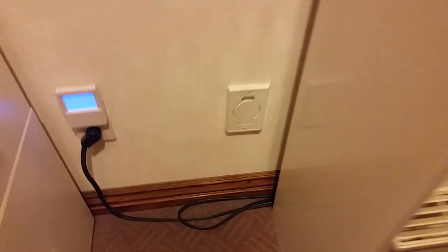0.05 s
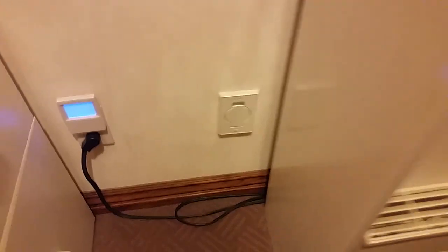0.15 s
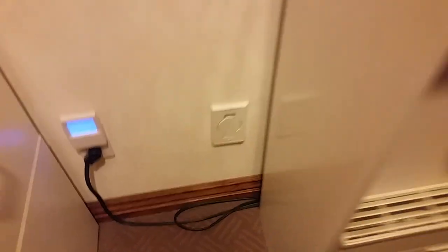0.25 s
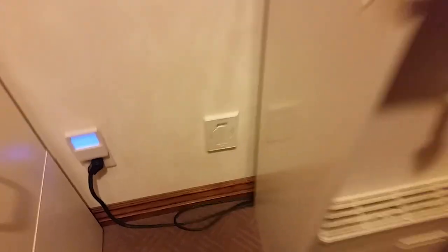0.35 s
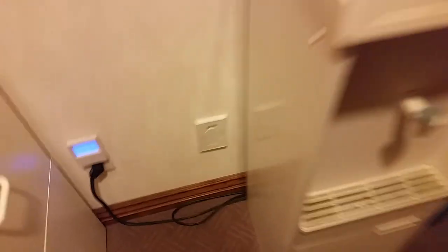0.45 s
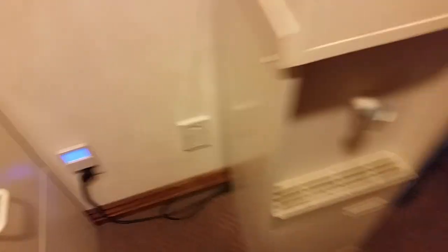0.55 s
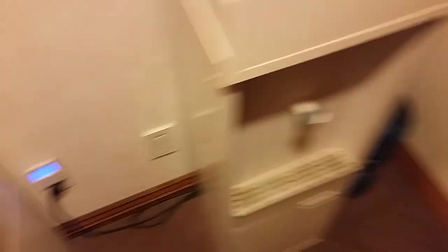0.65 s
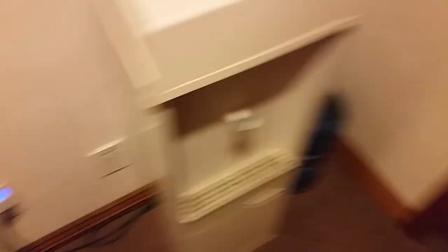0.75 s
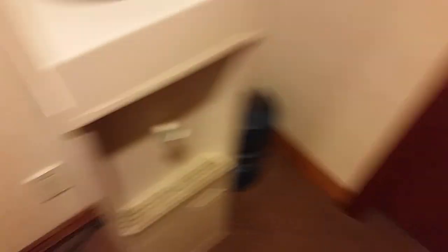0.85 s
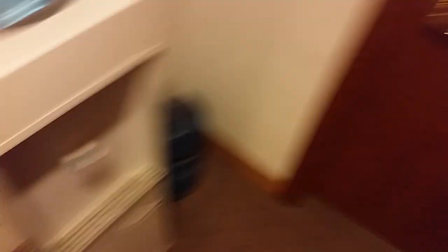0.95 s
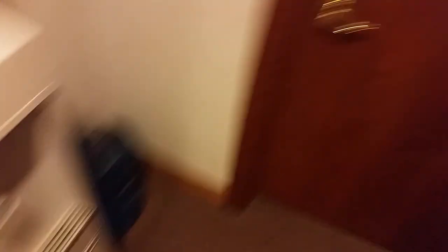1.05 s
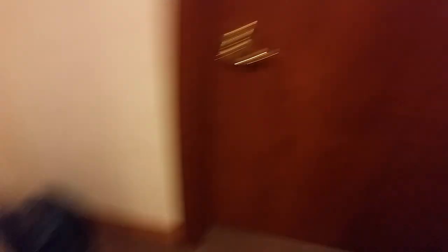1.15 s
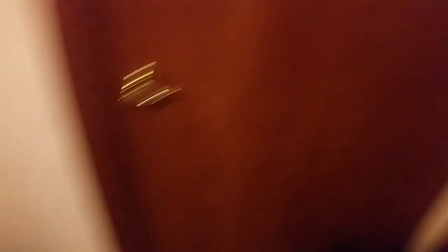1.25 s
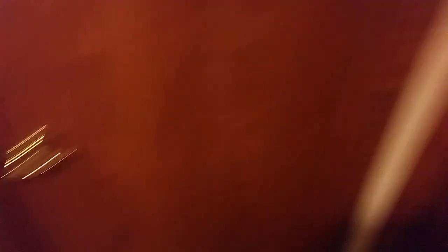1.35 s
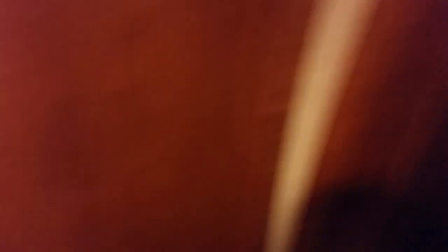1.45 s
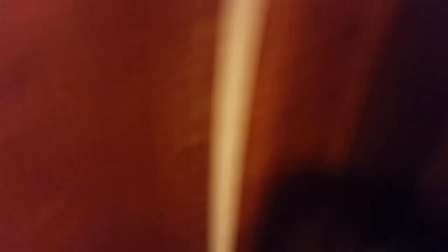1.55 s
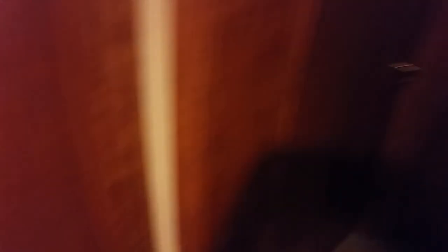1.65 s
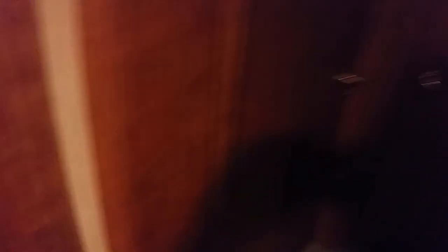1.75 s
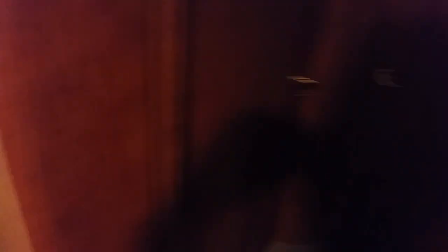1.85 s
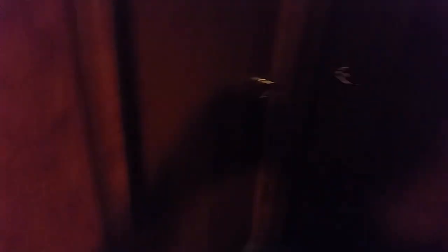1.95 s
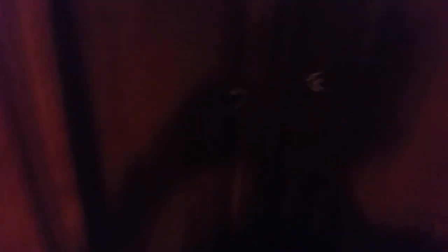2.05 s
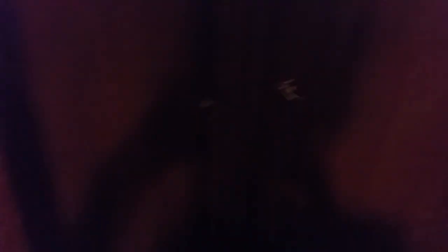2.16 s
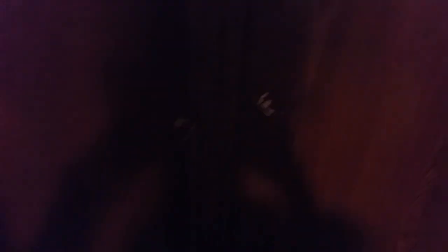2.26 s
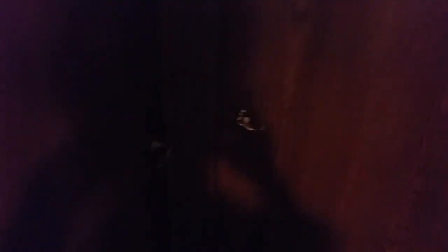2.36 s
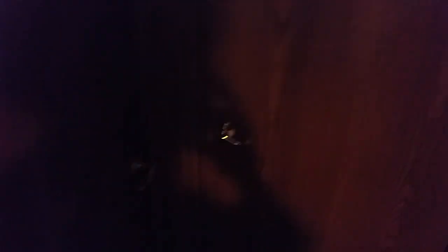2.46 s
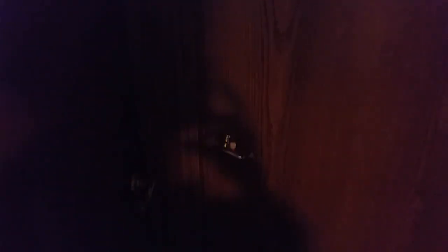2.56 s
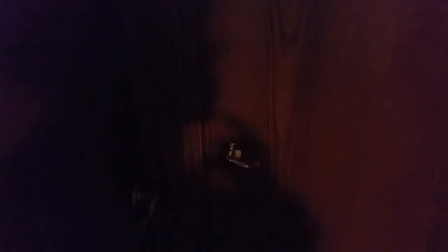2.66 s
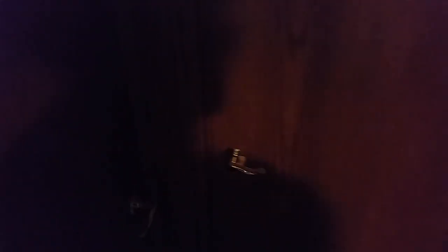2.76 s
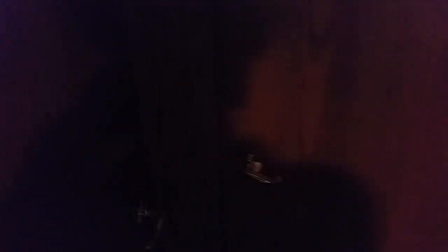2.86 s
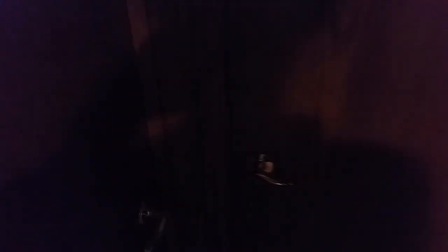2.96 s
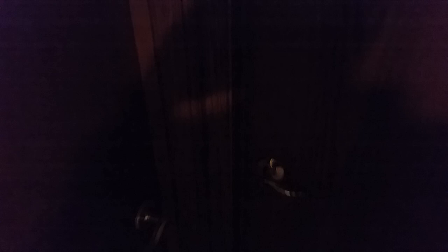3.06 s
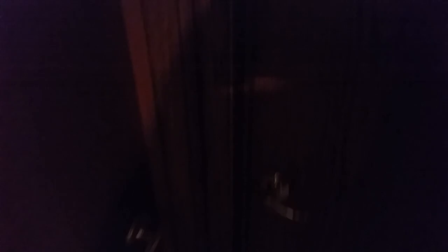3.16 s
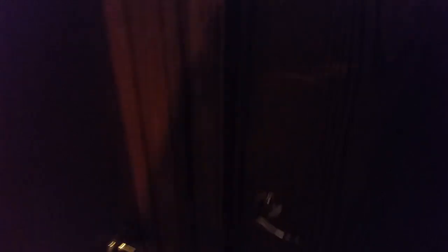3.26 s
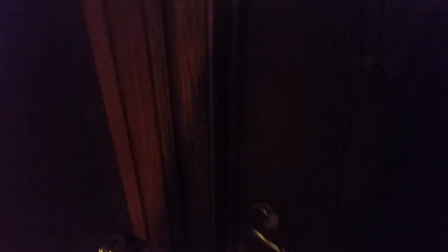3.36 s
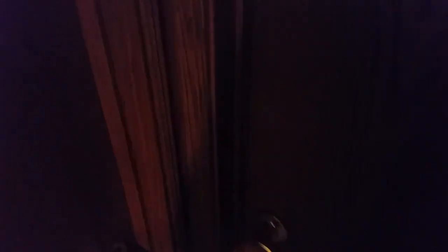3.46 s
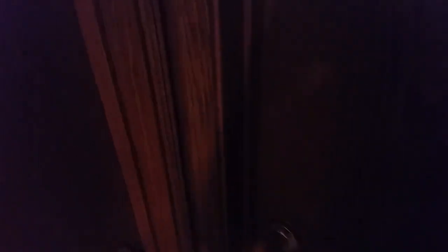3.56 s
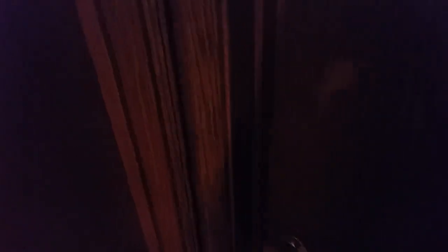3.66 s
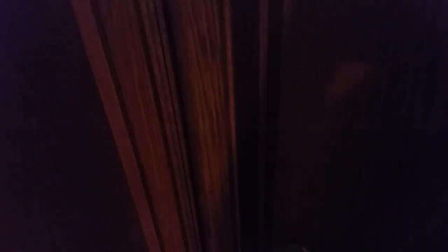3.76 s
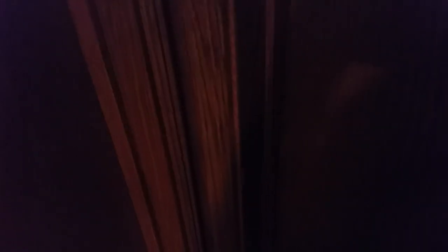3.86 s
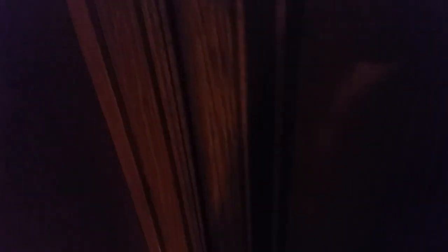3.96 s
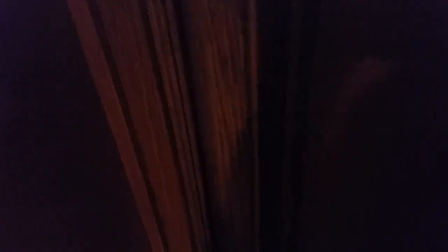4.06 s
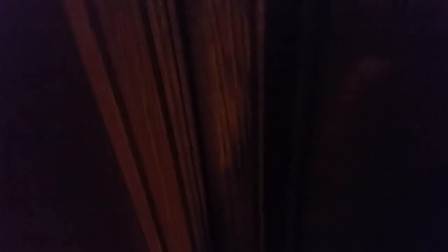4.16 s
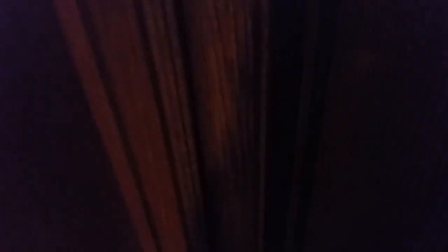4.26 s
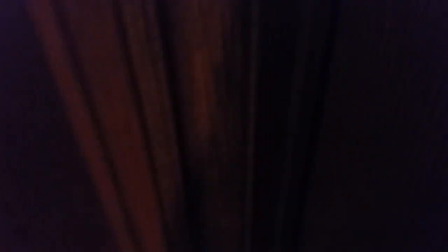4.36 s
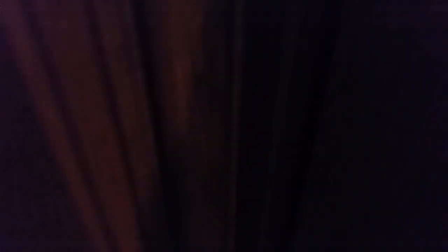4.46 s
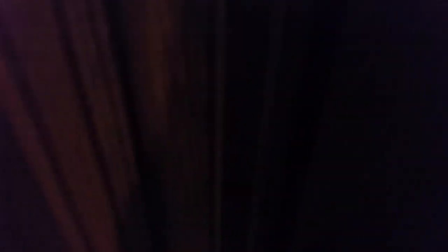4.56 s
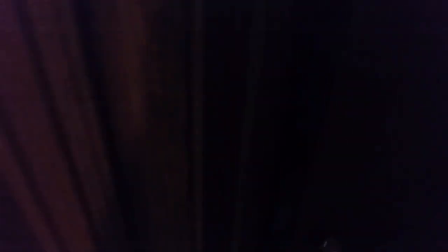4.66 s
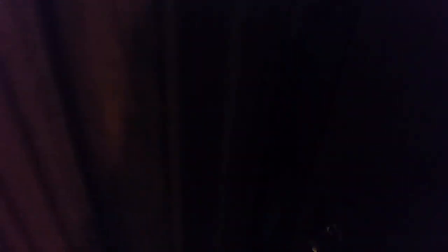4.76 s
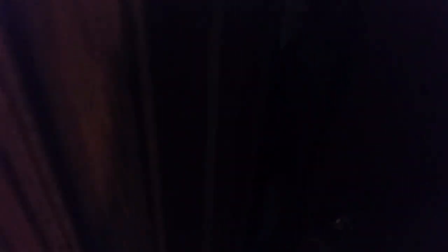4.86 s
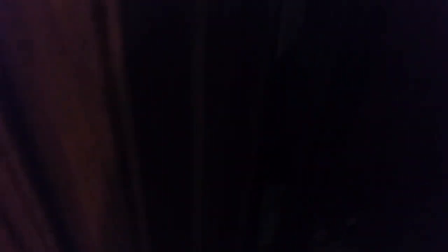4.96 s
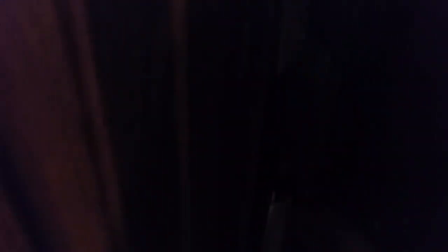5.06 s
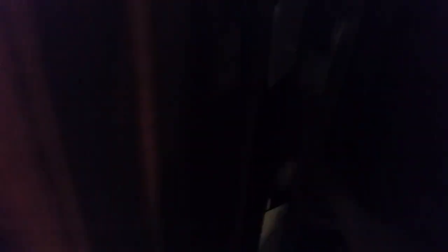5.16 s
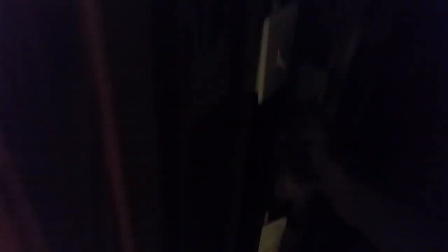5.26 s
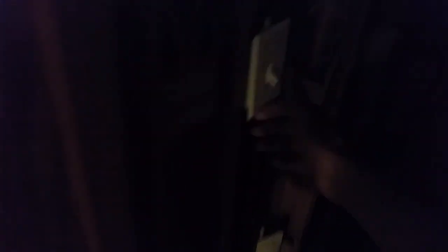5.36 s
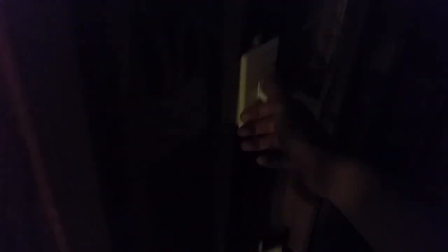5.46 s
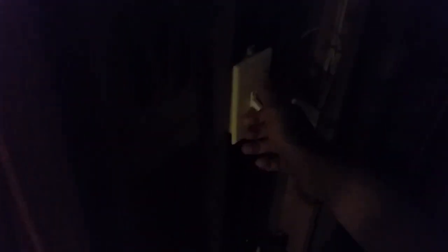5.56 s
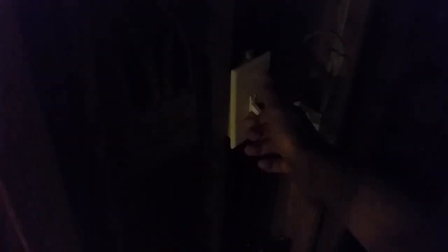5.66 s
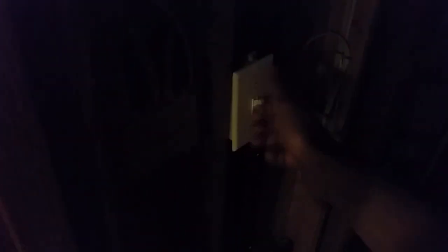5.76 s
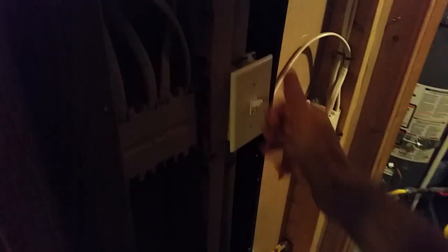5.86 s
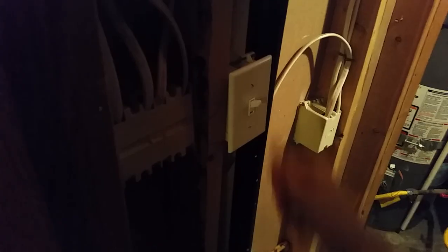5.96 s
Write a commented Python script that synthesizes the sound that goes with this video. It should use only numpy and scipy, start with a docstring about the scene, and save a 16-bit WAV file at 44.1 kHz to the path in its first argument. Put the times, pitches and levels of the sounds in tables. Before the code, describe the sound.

Close, rough stereo from a phone carried indoors: dull finger thumps and grainy rustles over a low cooler hum, then a hard crack on the case, far louder than everything else. Quieter handling follows. A door shudders with low booms, its latch rattles, its hinge squeaks upward, and it thuds. A toggle switch snaps in a small dry room.

```python
"""A cooler hums in a quiet house while fingers tap, shift and rub on the case of a phone carried in the hand.
A wooden door is unlatched: it shudders in its frame, the latch snaps, the hinge squeals upward, the leaf thuds.
Last a finger touches a wall switch, a very high squeak sounds, and the toggle snaps over with a low thump after it.
Hum, squeal and squeak are sines; air, cloth, scrape and clacks are shaped noise; blows are decaying modes."""
import sys
import numpy as np
from scipy import signal
from scipy.fft import rfft, irfft, next_fast_len
from scipy.io import wavfile
from scipy.ndimage import uniform_filter1d

SR = 44100
rng = np.random.default_rng(int(sys.argv[2]) if len(sys.argv) > 2 else 0)


def generate_wav(sig):
    """Save sig (samples, or channels by samples) to the path in sys.argv[1] as 16-bit PCM at SR."""
    pcm = np.round(np.clip(np.atleast_2d(sig).T, -1, 1) * 32767).astype(np.int16)
    wavfile.write(sys.argv[1], SR, pcm)


N = 265305
T = np.arange(N) / SR
LONG = next_fast_len(N)
F = np.maximum(np.fft.rfftfreq(LONG, 1 / SR), 1)
SIDES = np.array([[1], [-1]])  # left and right port
ALIKE_HZ = 405  # well below this both ports hear the same noise
ROOM_T60_S, ROOM_TOP_T60_S, ROOM_DB = 0.29, 0.22, -6  # low and treble decay; tail level
TOP_HZ = 15900


def undb(db):
    """dB to gain."""
    return 10 ** (np.asarray(db) / 20)


def unit(x):
    """Scale to rms 1."""
    return x / np.sqrt(np.mean(x ** 2))


def peak(x):
    """Scale to peak 1."""
    return x / np.abs(x).max()


def glide(table, column):
    """One table column over time, straight between rows and held outside them."""
    rows = np.array(table)
    return np.interp(T, rows[:, 0], rows[:, column])


def glide_or_silent(table, column):
    """One column of levels over time, -120 dB outside the table."""
    on = (T >= table[0][0]) & (T <= table[-1][0])
    return np.where(on, glide(table, column), -120)


def shape(table):
    """dB of a spectrum table at every frequency."""
    hz, db = np.transpose(table)
    return np.interp(np.log(F), np.log(hz), db)


def hiss(db):
    """Coloured stereo noise at rms 1, alike at both ports in the bass only."""
    mid, side = rfft(rng.standard_normal((2, LONG))) * undb(db)
    alike = 1 / (1 + (F / ALIKE_HZ) ** 2)
    spectrum = np.sqrt(1 + alike) * mid + SIDES * np.sqrt(1 - alike) * side
    return unit(irfft(spectrum, LONG)[:, :N])


def walk(rate):
    """Slow random drift, rms 1, with rate new values a second."""
    k = int(SR / rate)
    steps = np.repeat(rng.standard_normal(N // k + 1), k)
    return unit(uniform_filter1d(steps, k)[:N])


def grit(spread_db, ms):
    """Uneven grains of level, each a few ms long."""
    grains = undb(spread_db * rng.exponential(size=N))
    return unit(uniform_filter1d(grains, max(int(ms * SR / 1000), 1)))


def ring(modes, t):
    """Decaying modes after one blow, peak 1."""
    return peak(sum(undb(db) * np.sin(2 * np.pi * hz * t) * 1000. ** (-t / t60) for hz, db, t60 in modes))


def add(out, s, x):
    """Mix x in at s seconds."""
    i = int(s * SR)
    out[..., i:i + x.shape[-1]] += x[..., :N - i]


def room(x):
    """Direct sound plus a decaying noise tail, shorter in the treble and different at each port."""
    t = T[:SR]
    noise = rng.standard_normal((2, SR))
    low = signal.sosfilt(signal.butter(2, 1500, fs=SR, output="sos"), noise)
    tail = low * 1000. ** (-t / ROOM_T60_S) + (noise - low) * 1000. ** (-t / ROOM_TOP_T60_S)
    tail = tail * (t > .004)  # the first reflections come after 4 ms
    tail = tail / np.sqrt(np.sum(tail ** 2, axis=1, keepdims=True))
    return x + undb(ROOM_DB) * signal.fftconvolve(x * np.ones((2, 1)), tail, axes=1)[:, :N]


# Hum lines of the cooler: (frequency [Hz], level relative to each other [dB])
HUM_LINES = [(118.4, -62.5), (177.6, -74), (296.1, -75.5), (532.9, -84)]
# Swell of the hum: (time [s], level of the strongest line [dB])
HUM_SWELL = [(0, -69), (.9, -66), (1.2, -54), (1.85, -57.5), (2.1, -62), (2.45, -63), (2.7, -72),
             (3.05, -65.5), (3.42, -68.5), (3.7, -55.5), (3.9, -65), (5.4, -58), (5.7, -49.5), (6.02, -56)]
# Spectrum of the still air: (frequency [Hz], relative level per Hz [dB])
AIR_COLOUR = [(15, -36.5), (25, -6.5), (114, 3), (149, -5.5), (185, 5), (229, 1), (677, -29.5), (734, -19),
              (1070, -32.5), (1740, -14.5), (2690, -19), (3920, -43.5), (9320, -40), (12200, -33),
              (16000, -42)]
AIR_DB = -68
WHINE_HZ, WHINE_DB = 1949, -84


def house():
    """Still air, a faint whine and the cooler's hum, swelling as the phone crosses the room's standing waves."""
    swell_db = glide(HUM_SWELL, 1) - max(db for _, db in HUM_LINES)
    hum = np.zeros(N)
    for hz, db in HUM_LINES:
        gain = np.sqrt(2) * undb(db + swell_db + 2.0 * walk(4))
        hum += gain * np.sin(2 * np.pi * (hz * T + rng.random()))
    whine_gain = np.sqrt(2) * undb(WHINE_DB + 2.0 * walk(8))
    whine = whine_gain * np.sin(2 * np.pi * WHINE_HZ * T + .8 * walk(20))
    air = hiss(shape(AIR_COLOUR)) * undb(AIR_DB + .8 * walk(17))
    return air + hum + whine


# Handling rumble and rustle, with the after-sounds of the knock and of the switch: (time [s], level [dB])
HANDLING = [(0, -62.5), (.45, -62), (.6, -55.5), (.8, -56), (1.05, -61), (1.12, -53.5), (2.02, -52.5),
            (2.3, -61), (2.53, -50), (2.75, -68), (3.13, -69.5), (3.16, -56.5), (3.47, -67.5),
            (3.92, -66.5), (5.55, -58), (5.855, -55.5), (5.89, -44.5), (6.02, -52.5)]
# Spectrum of the handling rumble: (frequency [Hz], relative level per Hz [dB])
RUMBLE_COLOUR = [(15, -38.5), (25, -8.5), (70, 0.5), (124, -2), (172, -12), (368, -9), (500, -9.5),
                 (692, -22), (1200, -34), (1560, -40.5), (2640, -120)]
# Spectrum of skin and cloth: (frequency [Hz], relative level per Hz [dB])
RUSTLE_COLOUR = [(410, -41.5), (700, 2.5), (819, -1.5), (1260, -3), (1440, -5), (2000, 2.5), (3460, -17),
                 (4990, -14), (7590, -39.5), (8420, -29), (10400, -31), (12800, -15), (16000, -26)]
# Separate rubs of skin and cloth: (time [s], peak level [dB], length [s], brightness [dB per octave])
RUBS = [(0.7916, -53.5, 0.035, -0.5), (0.908, -54, 0.037, 1.5), (1.0973, -41, 0.045, -1.5),
        (1.1265, -45, 0.051, -2), (1.2134, -49, 0.11, -3), (1.3063, -44, 0.086, 0.5),
        (1.331, -49, 0.043, 12), (1.407, -49.5, 0.056, 4.5), (1.6134, -47, 0.037, 0),
        (1.682, -45.5, 0.05, 3.5), (1.713, -44, 0.073, 4), (1.755, -48.5, 0.078, 3),
        (1.8274, -47, 0.045, 3), (1.915, -46, 0.065, 2), (1.9894, -50.5, 0.064, -0.5),
        (2.527, -57, 0.066, -2), (3.241, -59, 0.14, 3)]
RUSTLE_DB, RUSTLE_GROWTH, CALM_DB = -72, 1.1, -58.5  # cloth at calm handling; dB per dB; calm handling level


def hand():
    """Rumble through the case and grainy rustle of skin and cloth, which grows with the handling level."""
    handling_db = glide(HANDLING, 1)
    rumble = hiss(shape(RUMBLE_COLOUR)) * undb(handling_db + 1.8 * walk(30))
    cloth = hiss(shape(RUSTLE_COLOUR)) * grit(4.8, 3)
    rustle_db = RUSTLE_DB + RUSTLE_GROWTH * (handling_db - CALM_DB) + 2.3 * walk(25)
    out = rumble + cloth * undb(rustle_db)
    t = T[:SR // 4]
    octaves = np.log2(np.clip(np.fft.rfftfreq(len(t), 1 / SR), 700, 4500) / 2000)
    for k, (s, db, length, tilt_db) in enumerate(RUBS):
        piece = cloth[:, k * len(t):(k + 1) * len(t)]
        rub = unit(irfft(rfft(piece) * undb(tilt_db * octaves), len(t)))
        envelope = (1 - np.exp(-t / 0.00097)) * np.exp(-(t / length) ** 4)
        add(out, s, undb(db) * peak(rub * envelope))
    return out


# Fingers on the case: (time [s], thump peak level [dB], left minus right [dB], case ring against thump [dB])
TAPS = [(0.025, -40.5, -4, -34), (0.124, -45.5, 4, -10), (0.217, -44, 2.5, -10), (0.365, -46.5, -4, -15),
        (0.401, -43.5, -5, -13), (0.579, -48.5, 18, -20), (0.667, -34.5, 8.5, 0.5), (0.687, -41.5, -9, 1),
        (0.705, -45, 6, 1), (0.789, -48, 16, -0.5), (1.098, -39.5, -12, -2.5), (1.235, -45.5, 16, -2),
        (1.35, -45, 18, -3.5), (1.411, -36, -11.5, -5), (1.528, -39.5, -7, -6), (1.619, -40, -15, -1),
        (1.682, -36.5, 21.5, -6), (1.717, -37, -11, 0.5), (1.84, -49, -6, 9), (2.003, -45.5, 5, 7),
        (2.415, -44, 13.5, 1), (2.473, -47.5, 25, -2), (2.579, -42, 3.5, -9), (3.153, -41.5, -2.5, -20),
        (3.219, -47, 5, -21)]
# Modes of the case before the grip shifts them: (frequency [Hz], level [dB], t60 [s])
CASE_MODES = [(473.5, 5.5, 0.034), (243, -22, 0.26), (1300, 4, 0.0048), (1700, -9, 0.008),
              (2150, -14, 0.0066), (2750, -15.5, 0.007), (4400, -46, 0.0046), (11500, -42.5, .004)]
KNOCK_S, KNOCK_DB = 2.5070, -2.5
THUMP_HZ, THUMP_SPREAD = 112, 0.19  # middle of the thump tuning; its spread in log frequency
FIDGETS_PER_S, FIDGET_DB, FIDGET_PAN_DB = 4, 3, 10  # stray taps: rate; level above handling; widest pan


def fingers():
    """Taps: a damped thump and a short ring of the case, tuned by the grip; stray small ones; one hard knock."""
    out, t = np.zeros((2, N)), T[:SR // 3]
    when, side, mute = rng.random((3, int(FIDGETS_PER_S * N / SR)))
    handling_db = glide(HANDLING, 1)[(when * N).astype(int)]
    stray = np.column_stack([when * N / SR, handling_db + FIDGET_DB, FIDGET_PAN_DB * (2 * side - 1), -12 * mute])
    for s, db, pan_db, ring_db in np.vstack([TAPS, stray]):
        grip, flesh = rng.standard_normal(2)
        hz = THUMP_HZ * np.exp(THUMP_SPREAD * flesh)
        # soft flesh pushes gradually and the bounce slows
        bounce = np.sin(2 * np.pi * (1.46 * hz * t) ** 0.75)
        thump = peak(t * np.exp(-t * hz / 0.3) * bounce)
        case = ring(CASE_MODES[:3], t * (1 + .06 * grip)) * (1 - np.exp(-t / .001))
        add(out, s, -undb(db + SIDES * pan_db / 2) * (thump + undb(ring_db) * case))
    knock = ring(CASE_MODES, t) * (1 - np.exp(-t / 0.00062))
    dull = uniform_filter1d(knock, size=24, origin=6)  # the right port is shaded from the knock
    add(out, KNOCK_S, -undb(KNOCK_DB) * np.array([knock, dull]))
    # the nail follows the fingertip, next to the left port
    nail = ring(CASE_MODES[2:5], t) * (1 - np.exp(-t / .0003))
    add(out[0], KNOCK_S + .001, undb(-7) * nail)
    return out


OPEN_S, STILL_S, STOP_DB_PER_S = 3.94, 5.26, 140  # the leaf starts to move; comes to rest; how fast it fades
SLOW_S, SLOW_DB_PER_S = 5.0, 12  # after the thud the leaf drifts on


def swing(full_s, rise_db, hold_db, ease_s, fall_db, drift_db):
    """Level in dB while the leaf moves: rise, hold, ease to a drift, stop; rise and fall in dB per second."""
    def after(s):
        return np.clip(T - s, 0, None)
    db = np.maximum(hold_db - fall_db * after(ease_s), drift_db - SLOW_DB_PER_S * after(SLOW_S))
    db = db - rise_db * np.clip(full_s - T, 0, None) - STOP_DB_PER_S * after(STILL_S)
    return np.where(T > OPEN_S, db, -120)


# Low booms: the leaf jolts in its frame, and a last thump just after the switch:
# (time [s], boom peak level [dB], frequency [Hz])
BOOMS = [(3.943, -33, 63.1), (4.036, -23, 68), (4.126, -31, 87), (4.171, -19.5, 83), (4.195, -23.5, 75.5),
         (4.234, -14.5, 76.6), (4.334, -14.5, 75), (4.449, -25, 77.1), (4.499, -29.5, 83),
         (4.577, -30.5, 59.4), (4.764, -28.5, 79.7), (4.834, -26, 71), (4.894, -14, 77.8), (5.046, -36, 84),
         (5.11, -34, 76.1), (5.904, -35, 65)]
# Resonances of the leaf: (frequency [Hz], width at -6 dB [Hz], level [dB])
LEAF_MODES = [(105.3, 60, 0), (137.4, 23, -4.5), (177.1, 22, 3), (240.6, 43, -6.5), (308, 90, -13),
              (393, 35, -19), (490, 53, -18), (587, 51, -17.5), (787, 210, -29.5)]
# Spectrum of the scrape: (frequency [Hz], relative level per Hz [dB])
SCRAPE_COLOUR = [(290, -28.5), (500, -10), (1510, -19.5), (1640, -14), (2130, -17.5), (2850, -22),
                 (3980, -34.5), (12000, -42.5), (16000, -39.5)]
RISE_S, RISE_S_PER_DB = .031, .0005  # swell of a -14 dB boom; louder booms swell longer
WOOD_DB, WOOD_GROWTH = -25, 0.83  # knock with a -14 dB boom; dB per dB


def door():
    """Low booms with a knock of wood, shudder, scrape and the push of air; the last thump follows the switch."""
    booms, knocks, t = np.zeros(N), np.zeros(N), T[:SR // 2]
    for s, db, hz in BOOMS:
        over_db = db + 14
        # leaf and frame are coupled, so the boom swells before it dies
        rise = max(RISE_S + RISE_S_PER_DB * over_db, .01)
        swell = (t / rise * np.exp(1 - t / rise)) ** 2
        add(booms, s, undb(db) * swell * np.sin(2 * np.pi * hz * t))
        knock_gain = undb(WOOD_DB + WOOD_GROWTH * over_db)
        add(knocks, s, knock_gain * (1 - np.exp(-t / 0.0024)) * 1000. ** (-t / 0.17))
    leaf_power = sum(undb(db) ** 2 / (1 + (2 * (F - hz) / w) ** 2) ** 2 for hz, w, db in LEAF_MODES)
    shudder_db = swing(full_s=4.18, rise_db=65, hold_db=-38, ease_s=4.47, fall_db=50, drift_db=-46)
    scrape_db = swing(full_s=4.25, rise_db=95, hold_db=-55, ease_s=4.95, fall_db=20, drift_db=-62)
    gust_db = swing(full_s=4.25, rise_db=90, hold_db=-39, ease_s=4.55, fall_db=11, drift_db=-46)
    wood = hiss(10 * np.log10(leaf_power)) * (knocks + undb(shudder_db + 1.8 * walk(30)))
    scrape = hiss(shape(SCRAPE_COLOUR)) * grit(3.5, 2.8) * undb(scrape_db)
    gust_colour = shape([(15, -19), (25, 5.5), (37, 3.5), (50, 16.5), (70, -55.5)])
    gust = hiss(gust_colour)[0] * undb(gust_db)  # the same at both ports
    return booms + gust + scrape + wood


# Latch and handle clacks: (time [s], peak level before the room [dB], t60 [s], brightness [dB per octave])
CLACKS = [(4.0372, -47, 0.1, -5), (4.1677, -35, 0.23, 3), (4.2317, -34.5, 0.32, -1),
          (4.3325, -26.5, 0.17, -3.5), (4.7552, -30, 0.088, 0.5), (4.8085, -26.5, 0.18, 1),
          (4.8289, -16.5, 0.053, 2.5), (4.8339, -21.5, 0.19, -3), (4.8588, -28, 0.062, -5.5),
          (4.887, -20, 0.14, -5.5), (4.8965, -32.5, 0.061, 5)]
# Spectrum of the metal before the brightness tilt: (frequency [Hz], relative level per Hz [dB])
LATCH_COLOUR = [(240, -21), (400, -12), (1060, -4), (1680, -3.5), (2290, -10), (2710, -6.5), (3530, -21),
                (5030, -17.5), (6640, -30), (10200, -28.5), (11400, -23), (14100, -29), (16000, -43)]


def latch():
    """Metal clacks: sharp noise bursts that die fast and fill the room."""
    out, t = np.zeros((2, N)), T[:SR // 4]
    metal = rfft(hiss(shape(LATCH_COLOUR)), LONG)
    for k, (s, db, t60, tilt_db) in enumerate(CLACKS):
        tilted = unit(irfft(metal * undb(tilt_db * np.log2(F / 2000)), LONG))
        burst = tilted[:, k * len(t):(k + 1) * len(t)]
        add(out, s, undb(db) * peak(burst * (1 - np.exp(-t / .0015)) * 1000. ** (-t / t60)))
    return room(out)


# Hinge squeal: (time [s], slip rate before its wobble [Hz], level before colour and catches [dB])
HINGE = [(4.53, 870, -64), (4.55, 950, -51), (4.59, 1110, -47), (4.635, 1260, -44), (4.675, 1360, -46),
         (4.697, 1465, -44), (4.75, 1505, -46), (4.83, 1570, -43), (4.87, 1590, -45), (4.91, 1570, -56)]
# Colour of pin and leaf: (frequency [Hz], gain [dB])
PIN_COLOUR = [(950, 1), (1300, 0), (1500, 8), (2000, 1), (2550, 5), (3000, 2.5), (3500, -8), (4500, -7),
              (8000, -10), (12000, -4.5)]
ORDER_DB, SOFTEN_DB_PER_S = -2.1, 14.5  # change per partial; further loss as the pin runs smoother
CATCHES_S, CATCH_S, CATCH_DB = [4.685, 4.738, 4.775], .007, -14  # the pin sticks for a moment
SMOOTH_S, SMOOTH_SHARE = 4.69, .35  # from here on the slip is steadier


def hinge():
    """Stick-slip squeal: a harmonic stack on the slip rate, rough at first, coloured by pin and leaf."""
    rough = np.where(T < SMOOTH_S, 1, SMOOTH_SHARE)
    hz = glide(HINGE, 1) * (1 + rough * (.025 * walk(500) + .012 * walk(90)))
    phase = 2 * np.pi * (np.cumsum(hz) / SR + SIDES * hz * .00015)  # one port is nearer
    catch_db = CATCH_DB * sum(np.exp(-((T - s) / CATCH_S) ** 2) for s in CATCHES_S)
    grip_db = glide_or_silent(HINGE, 2) + catch_db + 2.5 * walk(70)
    loss_db = ORDER_DB - SOFTEN_DB_PER_S * np.clip(T - HINGE[0][0], 0, None)
    pin_hz, pin_db = np.transpose(PIN_COLOUR)
    squeal = np.zeros((2, N))
    for k in range(1, 11):
        colour_db = np.interp(np.log(k * hz), np.log(pin_hz), pin_db) + (k - 1) * loss_db
        flicker_db = 3.0 * rough ** .5 * walk(250) + 2.5 * walk(45)
        squeal += np.sqrt(2) * undb(grip_db + colour_db + flicker_db) * np.sin(k * phase)
    return room(squeal)


# A finger touches the switch plate, then the toggle snaps over:
# (time [s], ring level before onset and room [dB], click level before onset and room [dB])
SWITCH_HITS = [(5.532, -49.5, -64), (5.833, -58, -42), (5.839, -36.5, -52), (5.858, -56, -27),
               (5.862, -28.5, -20.5), (5.867, -16, -44)]
# Modes of box and stud: (frequency [Hz], level [dB], t60 [s])
SWITCH_MODES = [(225.3, -0.5, 0.092), (300.6, -12, 0.22), (481, -11, 0.091), (700, -13, 0.12),
                (800, -2.5, 0.035), (1115, -13, 0.091), (1323, -22, 0.13), (1650, -18, 0.06),
                (1995, -18, 0.049), (2560, -23, 0.064)]


def switch():
    """A finger touches the plate, then the toggle snaps over: noise clicks with the modal ring of box and stud."""
    out, t = np.zeros((2, N)), T[:SR // 4]
    click = hiss(shape([(300, 5), (900, 14.5), (4000, -7.5), (8000, -17.5), (12000, -6), (16000, -15)]))
    body = ring(SWITCH_MODES, t)
    for k, (s, ring_db, click_db) in enumerate(SWITCH_HITS):
        crack = peak(click[:, k * len(t):(k + 1) * len(t)] * 1000. ** (-t / 0.057))
        onset = 1 - np.exp(-t / 0.00036)
        add(out, s, (undb(ring_db) * body + undb(click_db) * crack) * onset)
    return room(out)


# High squeak: (time [s], frequency before its waver [Hz], level before waver and room [dB])
SQUEAK = [(5.57, 15300, -75), (5.59, 15350, -59), (5.64, 15400, -63), (5.665, 15570, -52),
          (5.7, 15200, -56), (5.74, 14900, -72)]


def squeak():
    """A thin sine near the top of hearing, wavering in pitch and level."""
    hz = glide(SQUEAK, 1) * (1 + .004 * walk(150))
    gain = np.sqrt(2) * undb(glide_or_silent(SQUEAK, 2) + 2.5 * walk(70))
    return room(gain * np.sin(2 * np.pi * np.cumsum(hz) / SR))


# Colour of the two microphone ports: (frequency [Hz], left minus right [dB])
PORT_BALANCE = [(60, 1), (110, -2), (200, 2), (380, 0.5), (700, 2.5), (1290, 7), (2380, 7.5), (4400, 11),
                (8120, 8.5), (15000, -10)]


def scene():
    """Airborne sounds reach the two ports with different colour; taps come through the case."""
    air = house() + hand() + door() + latch() + hinge() + switch() + squeak()
    ports = undb(SIDES * shape(PORT_BALANCE) / 2)
    ports = ports / np.sqrt(np.mean(ports ** 2, axis=0))  # keeps the power of the pair
    return irfft(rfft(air, LONG) * ports, LONG)[:, :N] + fingers()


def record(dry):
    """The phone cuts the top with a steep low-pass."""
    return signal.sosfilt(signal.ellip(10, .2, 80, TOP_HZ, fs=SR, output="sos"), dry)


dry = scene()
out = record(dry)
generate_wav(out)
```